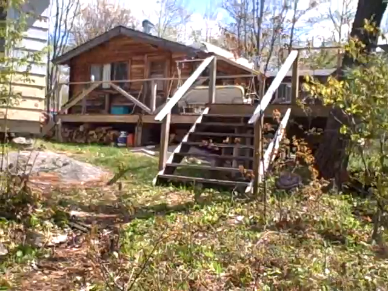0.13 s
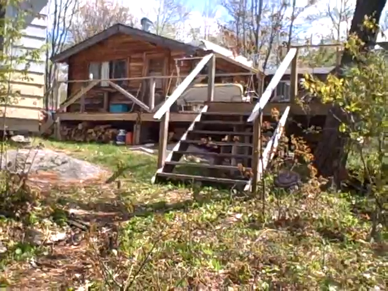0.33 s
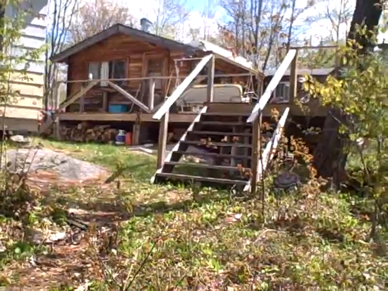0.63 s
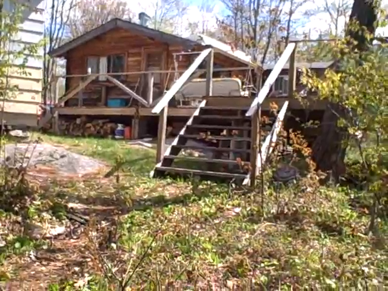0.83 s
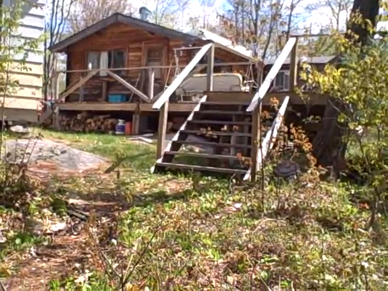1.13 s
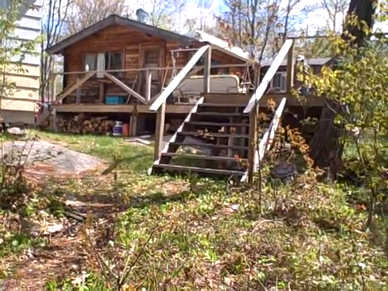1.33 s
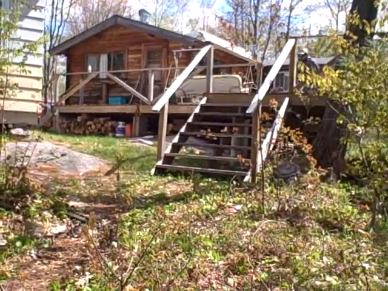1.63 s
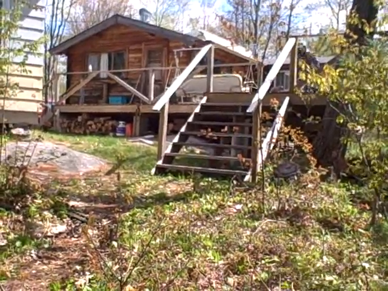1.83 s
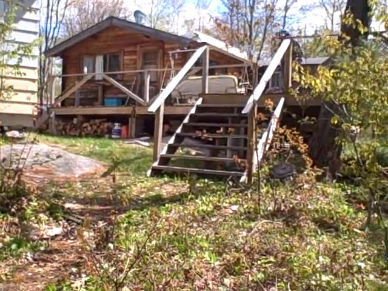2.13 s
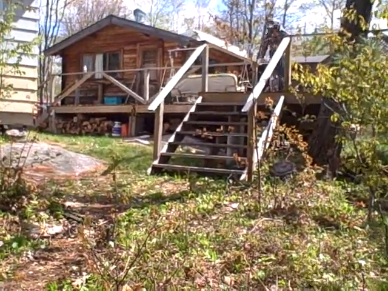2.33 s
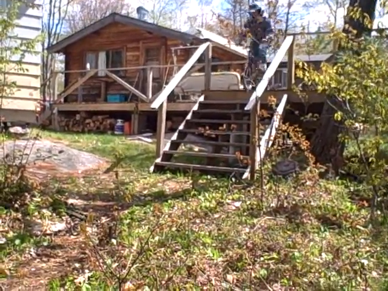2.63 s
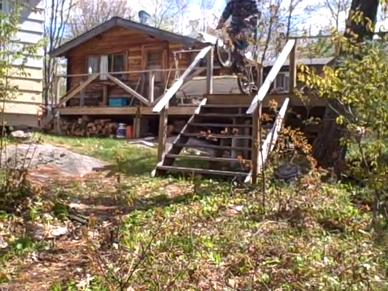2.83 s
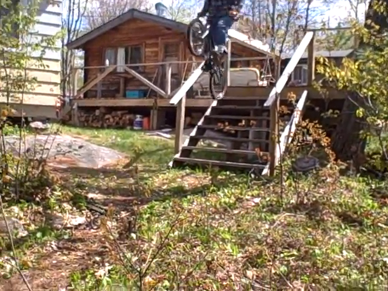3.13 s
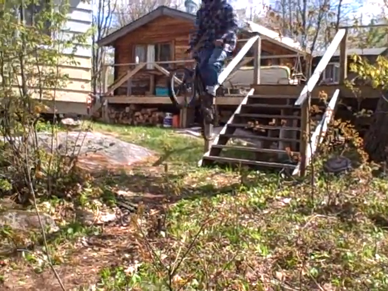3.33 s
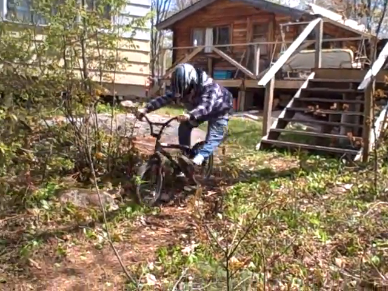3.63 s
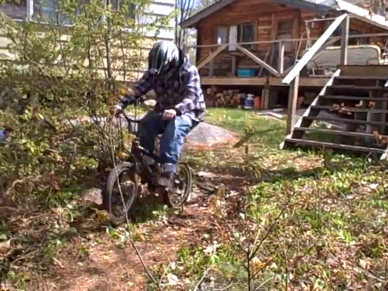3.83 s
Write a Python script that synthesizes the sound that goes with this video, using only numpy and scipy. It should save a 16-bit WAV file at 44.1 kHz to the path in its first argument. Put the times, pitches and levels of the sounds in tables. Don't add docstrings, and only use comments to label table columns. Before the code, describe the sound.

A bicycle approaches in a quiet wooded yard. Until 1.8 s there is soft tree hiss, low wind buffeting the microphone, and faint ticks and metallic jingles. Tyres then drum hollow planks, with knocks near 2.0 s and the strongest at 2.3 s, plus a slap at 2.65 s. Airborne wheels whirr softly from 3.2 s. Two thuds at 3.55 and 3.62 s start loud leaf crunching, sharpest crack at 3.73 s, crackling to the end.

```python
import sys
import numpy as np
from scipy import signal
from scipy.fft import rfft, irfft
from scipy.io import wavfile

SR = 44100
rng = np.random.default_rng(int(sys.argv[2]) if len(sys.argv) > 2 else 0)


def decibels_to_gain(level_db):
    exponent = np.asarray(level_db, float) / 20
    return 10 ** exponent


def persist_wave(psi):
    counts = np.round(np.clip(psi, -1, 1) * 32767).astype(np.int16)
    wavfile.write(sys.argv[1], SR, np.atleast_2d(counts).T)


N = 176400
T = np.arange(N) / SR


def unit_rms(x):
    return x / np.sqrt(np.mean(x ** 2) + 1e-20)


def gain_curve(points):
    return decibels_to_gain(np.interp(T, *np.transpose(points)))


def spectrum_db(points, hz):
    point_hz, point_db = np.transpose(points)
    return np.interp(np.log(hz + 1), np.log(point_hz + 1), point_db)


def colour(x, points):
    magnitude = decibels_to_gain(spectrum_db(points, np.fft.rfftfreq(8192, 1 / SR)))
    cepstrum = irfft(np.log(magnitude))
    cepstrum[1:4096] *= 2
    cepstrum[4097:] = 0
    impulse = irfft(np.exp(rfft(cepstrum)))[:4096]
    return unit_rms(signal.oaconvolve(x, impulse)[:N])


def white():
    return rng.standard_normal(N)


def drift(per_s):
    return unit_rms(signal.lfilter(*signal.butter(2, 2 * per_s / SR), white()))


def decay(start_s, t60_s, rise_s=0.00024):
    t = np.maximum(T - start_s, 0)
    return np.minimum(t / max(rise_s, 1e-4), 1) * decibels_to_gain(-60 * t / t60_s)


def grains(per_s, spread_db):
    hit, sign, size = rng.random((3, N))
    level = decibels_to_gain(-spread_db * np.log(np.maximum(size, .01)))
    return (hit < per_s / SR) * np.sign(sign - .5) * level


def pressure_pulses(rows):
    out = np.zeros(N)
    for start_s, db, hz, cycles in rows:
        u = np.clip((T - start_s) * hz / cycles, 0, 1)
        out += decibels_to_gain(db) * np.sin(np.pi * u ** 0.65) ** 2 * np.sin(2 * np.pi * cycles * u)
    return out


# (frequency [Hz], density [dB per Hz])
AIR_SPECTRUM = [(100, -0.5), (170, -4), (270, -2), (400, -5), (732, -2.5), (2190, -14), (6580, -22.5),
                (11500, -26), (15500, -24.5)]
AIR_DB = -56.5


def air():
    rustle = white() + .5 * grains(330, 3.0)
    swell = decibels_to_gain(AIR_DB + .5 * drift(5.4))
    return swell * colour(rustle, [(30, -33)] + list(AIR_SPECTRUM))


# (time [s], level [dB])
GUSTS = [(.05, -46.5), (.3, -49), (.75, -56), (1.05, -49.5), (1.26, -44), (1.34, -29), (1.43, -42.5),
         (1.6, -45.5), (1.7, -34), (1.85, -41), (2.2, -43), (2.35, -42), (2.5, -41.5), (2.8, -41),
         (2.93, -44.5), (3.15, -45.5), (3.5, -44), (4.0, -39.5)]
# (frequency [Hz], density [dB per Hz])
BUFFET_SPECTRUM = [(12, -4.5), (30, 6.5), (85, -6.5), (180, -15.5), (330, -28.5), (600, -41)]
# (time [s], peak [dB], pitch [Hz], length [cycles])
PUFFS = [(.335, -33, 89, 1.34), (1.283, -34, 70, 1.6), (1.305, -31, 70, 1.44), (1.332, -27, 189, 1.02),
         (1.342, -22.5, 77, 0.71), (1.359, -31.5, 77, 2.8), (1.31, -37, 180, 3), (1.365, -37, 210, 4),
         (1.395, -29, 170, 0.95), (1.642, -32, 60, 1.4), (1.668, -30, 44.8, 1.5),
         (1.6932, -22.5, 234, 1.11), (1.6938, -33, 400, 1.4), (1.706, -30, 55.5, 1.1),
         (1.828, -33, 89, 1.46), (2.53, -33, 55, 1.9), (2.598, -29.5, 55, 0.78), (2.737, -32, 49, 1.1),
         (2.766, -25.5, 71, 0.97), (2.805, -26, 52, 0.96), (3.2, -35.5, 41.6, 2), (3.445, -31, 45, 1.3),
         (3.496, -30, 55.4, 1.7), (3.538, -30.5, 50, 1.1), (3.8, -30.5, 90, 0.97), (3.895, -28.5, 127, 2.7),
         (3.925, -22, 73.3, 1.08)]
LUMPY_DB, LUMPS_PER_S = 2.5, 14
SHARPEN_DB_PER_DB = 0.53


def wind():
    lumps = white() * decibels_to_gain(LUMPY_DB * drift(LUMPS_PER_S))
    lumps = colour(lumps, list(BUFFET_SPECTRUM) + [(1500, -72.0)])
    low = signal.filtfilt(*signal.butter(2, 60, fs=SR), lumps)
    level = gain_curve(GUSTS)
    upper = (lumps - low) * (level / decibels_to_gain(-42.5)) ** SHARPEN_DB_PER_DB
    return level * (low + upper) + pressure_pulses(PUFFS)


# (time [s], peak [dB], pitch [Hz], length [s])
JINGLES = [(0.668, -63, 5700, .03), (.755, -56, 2930, .02), (.758, -57, 5500, .015), (.78, -58, 2910, .02),
           (.772, -61, 6540, .06), (.872, -59, 6500, 0.074), (.875, -58, 2880, 0.028),
           (1.05, -64, 6450, 0.039), (1.1, -69, 6520, 0.024), (1.102, -61, 5800, 0.016),
           (1.205, -67, 6520, .03), (1.39, -65, 5980, .07)]
JINGLE_DB, BLUR_RAD = -8, .8


def jingle():
    out, wander = np.zeros(N), BLUR_RAD * drift(150)
    for start_s, db, hz, length_s in JINGLES:
        swell = np.sin(np.pi * np.clip((T - start_s) / length_s, 0, 1) ** .6)
        out += decibels_to_gain(db) * swell * np.sin(2 * np.pi * hz * T + wander)
    return out * decibels_to_gain(JINGLE_DB)


# (time [s], level [dB], dull edge [Hz], t60 [s])
SLAPS = [
    (1.904, -48.5, 2300, 0.13),
    (2.7, -55, 1100, .2),
    (2.646, -42, 1860, 0.21),
    (2.835, -61.5, 11000, 0.059),
    (2.76, -59.5, 12000, .1),
]
# (time [s], level [dB], centre [Hz], t60 [s])
TICKS = [(.35, -58, 12000, .015), (.635, -58, 11500, .015), (.665, -60, 8500, .02), (.7, -61, 11000, 0.09),
         (.918, -58, 13000, .012), (1.152, -60, 9200, .02), (.993, -59, 11500, .015),
         (1.22, -59, 7000, 0.033), (1.291, -52, 11800, 0.014), (1.303, -59, 9000, .012),
         (1.439, -63, 13500, .015), (1.49, -58, 10000, .04), (1.905, -50, 7440, .02),
         (.385, -50, 1200, .02), (.453, -47, 1400, .025), (2.033, -56.5, 11000, 0.054),
         (2.505, -60, 10000, .02), (3.392, -41, 9000, 0.01), (3.458, -40.5, 7000, 0.01),
         (3.483, -50, 9000, .02), (3.499, -40.5, 7000, .015), (3.5274, -34, 13000, 0.012)]
TICK_WIDTH = 0.72


def clatter():
    out, noise = np.zeros(N), white()
    for start_s, db, edge_hz, t60_s in SLAPS:
        band = signal.butter(1, [500, min(edge_hz, 20000)], "band", fs=SR)
        burst = signal.lfilter([.7, .3], 1, noise * decay(start_s, t60_s, 0.00057))
        out += decibels_to_gain(db + 9) * signal.lfilter(*band, burst)
    for start_s, db, hz, t60_s in TICKS:
        edges_hz = [hz * (1 - TICK_WIDTH / 2), hz * (1 + TICK_WIDTH / 2)]
        band = signal.butter(2, edges_hz, "band", fs=SR)
        out += decibels_to_gain(db + 4.0) * signal.lfilter(*band, noise * decay(start_s, t60_s))
    return out + jingle()


ECHO_DB, ECHO_T60_S = -11, 0.47


def yard_echo(x):
    t = T[:SR // 2]
    tail = grains(2000, 0)[:len(t)] * decibels_to_gain(-60 * t / ECHO_T60_S) * (t > .006)
    return x + decibels_to_gain(ECHO_DB) * signal.oaconvolve(x, tail / np.linalg.norm(tail))[:N]


def ring(modes):
    t = T[:SR // 4]
    out = sum(decibels_to_gain(db - 60 * t / t60_s) * np.sin(2 * np.pi * hz * t) for hz, db, t60_s in modes)
    return out / np.linalg.norm(out)


# (frequency [Hz], level [dB])
PLANK_MODES = [(250, -3), (299, 4), (351, -2), (372, -8), (430, -8), (575, -2.5), (694, 0), (765, -1.5),
               (870, -9.5), (964, -8), (1090, -8), (1230, -17), (1685, 1)]
PLANK_T60_S, PLACE_OCTAVES = .14, .55


def planks(place_hz):
    modes = []
    for hz, db in PLANK_MODES:
        octaves = np.log2(hz / place_hz)
        t60_s = PLANK_T60_S * (300 / hz) ** 0.57
        modes.append((hz, db - 6 * (octaves / PLACE_OCTAVES) ** 2, t60_s))
    return signal.lfilter(*signal.butter(2, 235, "high", fs=SR), ring(modes))


# (time [s], level [dB])
ROLL = [
    (1.65, -80),
    (1.8, -56),
    (2.05, -55),
    (2.2, -54),
    (2.55, -57.5),
    (2.8, -57),
    (3.05, -64.5),
]
# (time [s], level [dB], struck place [Hz], chatter t60 [s])
KNOCKS = [(1.832, -47, 463, 0.084), (1.905, -48.5, 760, 0.25), (1.99, -52, 900, 0.11),
          (1.985, -37.5, 255, 0.11), (2.003, -50, 240, 0.069), (2.017, -42, 249, 0.073),
          (2.035, -44, 240, 0.094), (2.299, -31, 334, 0.062), (2.2982, -35.5, 760, 0.082),
          (2.31, -34, 690, 0.075), (2.321, -35.5, 313, 0.18), (2.343, -33.5, 310, 0.064),
          (2.359, -36, 330, .03), (2.383, -47.5, 780, 0.16), (2.401, -47, 350, 0.26),
          (2.47, -49, 257, 0.17), (2.646, -47.5, 340, 0.15), (2.72, -54, 750, 0.079),
          (2.779, -45, 393, 0.066)]
ROLL_HZ, ROLL_BUMPS_PER_S = 295, 400
STRIKE_GAIN = 8.1


def deck():
    on = (T > ROLL[0][0]) & (T < ROLL[-1][0])
    bumps = grains(ROLL_BUMPS_PER_S, 2.9)
    drumming = unit_rms(signal.oaconvolve(bumps, planks(ROLL_HZ))[:N])
    out = drumming * gain_curve(ROLL) * on
    chatter = white()
    for start_s, db, place_hz, t60_s in KNOCKS:
        strike = STRIKE_GAIN * (np.arange(N) == round(start_s * SR))
        blow = chatter * decay(start_s, t60_s, 0.0014) + strike
        out += decibels_to_gain(db + 4.5) * signal.oaconvolve(blow, planks(place_hz))[:N]
    return out


# (time [s], level [dB])
WHIRR = [
    (3.13, -67),
    (3.2, -57),
    (3.27, -48.5),
    (3.34, -52),
    (3.5, -48),
    (3.6, -59),
    (3.7, -48),
]
# (frequency [Hz], density [dB per Hz])
WHIRR_SPECTRUM = [(1500, -19), (3000, -10.5), (10000, -9), (16000, -3)]


def whirr():
    on = T > WHIRR[0][0]
    hiss = white() + 0.81 * grains(500, 3.5)
    flutter = decibels_to_gain(1.1 * drift(40))
    return on * gain_curve(WHIRR) * flutter * colour(hiss, [(600, -26)] + list(WHIRR_SPECTRUM))


# (time [s], peak [dB], pitch [Hz])
CRACKS = [(3.5559, -30, 4200), (3.5588, -27, 6200), (3.565, -38, 4500), (3.6029, -34, 5700),
          (3.622, -22, 4700), (3.626, -21.5, 4500), (3.6352, -23, 3600), (3.6424, -20, 5400),
          (3.6786, -20, 3400), (3.6872, -21, 7500), (3.6951, -16, 9300), (3.702, -20, 6600),
          (3.709, -22, 9600), (3.7118, -25, 7000), (3.7285, -7, 14500), (3.72865, -13.5, 5500),
          (3.73, -13, 12000), (3.7313, -14, 9500), (3.743, -21, 5500), (3.7576, -27, 6100),
          (3.771, -26, 8000), (3.774, -17, 5200), (3.7859, -20, 6400), (3.7906, -24, 7000),
          (3.8205, -22, 7800), (3.8292, -28, 4500), (3.8343, -27, 5400), (3.8408, -26, 5800),
          (3.8647, -19, 6900), (3.875, -23, 8200), (3.881, -28, 10300), (3.8883, -27, 5600),
          (3.9145, -30, 5000), (3.93, -26.5, 4500), (3.9331, -27, 5700), (3.9768, -24, 8900)]
CRACK_CYCLES = .45


def cracks():
    out = np.zeros(N)
    for (start_s, db, hz), phase in zip(CRACKS, rng.random(len(CRACKS))):
        centre = round(start_s * SR)
        near = slice(centre - 40, centre + 40)
        u = (T[near] - start_s) * hz
        out[near] += decibels_to_gain(db) * np.exp(-(u / CRACK_CYCLES) ** 2) * np.cos(2 * np.pi * (u + phase))
    return out


# (time [s], peak [dB], pitch [Hz], length [cycles])
THUDS = [
    (3.5545, -24.5, 149, 2.3),
    (3.6243, -19.5, 210, 2.64),
]
# (frequency [Hz], density [dB per Hz])
LEAF_SPECTRUM = [(250, 8.5), (450, 7.5), (700, 6.5), (1300, 0.5), (2700, 1), (6500, 3.5), (10500, 0),
                 (15500, 3)]
# (time [s], level [dB], rise [s], t60 [s])
CRUNCHES = [(3.553, -33, 0.0035, 0.15), (3.599, -40, 0.0026, 0.1), (3.621, -27.5, 0.0018, .12),
            (3.636, -28.5, .012, 0.32), (3.672, -32.5, 0.018, 0.35), (3.729, -24, 0.0014, 0.07),
            (3.74, -31.5, 0.018, 0.46), (3.77, -34, 0.0055, 0.18), (3.818, -38.5, .003, 0.45),
            (3.857, -34, 0.009, 0.19), (3.868, -35.5, .006, 0.17), (3.91, -41, 0.0058, 0.81),
            (3.965, -38, 0.02, 0.64)]
# (time [s], level [dB],
# centre [Hz])
SNAPS = [(3.557, -30, 740), (3.6207, -32.5, 680), (3.632, -37, 700), (3.7282, -15.5, 10000),
         (3.7283, -26, 2200), (3.7302, -24, 8000), (3.624, -33, 380), (3.666, -36, 830), (3.58, -41.5, 520),
         (3.874, -33, 3200), (3.887, -35, 704), (3.821, -36, 750), (3.99, -38, 900)]
GRAINS_PER_S, GRAIN_SPREAD_DB, FIZZ, PATCHY_DB = 4500, 2.2, .9, 2.0
SNAP_CYCLES, SNAP_T60_S = 20, .004


def landing():
    power = sum((decibels_to_gain(db) * decay(s, t60_s, rise_s)) ** 2 for s, db, rise_s, t60_s in CRUNCHES)
    litter = FIZZ * white()
    for hz in np.geomspace(900, 13000, 5):
        band = signal.butter(1, [hz / 1.4, hz * 1.4], "band", fs=SR)
        breaks = unit_rms(grains(GRAINS_PER_S / 4, GRAIN_SPREAD_DB))
        litter += signal.lfilter(*band, decibels_to_gain(PATCHY_DB * drift(38)) * breaks)
    out = np.sqrt(power) * colour(litter, [(80, -27)] + list(LEAF_SPECTRUM))
    noise = white()
    for start_s, db, hz in SNAPS:
        band = signal.butter(1, [hz / 2, min(hz * 2, 20000)], "band", fs=SR)
        envelope = decay(start_s, SNAP_CYCLES / hz + SNAP_T60_S, 0.00012)
        out += decibels_to_gain(db) * envelope * unit_rms(signal.lfilter(*band, noise))
    return out + pressure_pulses(THUDS) + cracks()


def scene():
    impacts = clatter() + deck() + landing()
    return (air() + wind() + yard_echo(impacts) + whirr())[None]


def roll_off(x):
    return signal.sosfilt(signal.butter(12, 16990, fs=SR, output="sos"), x)


START_S, FADE_S, EDGE_HZ = 0.034, 0.0091, 15850


def record(dry):
    faded = dry * np.clip((T - START_S) / FADE_S, 0, 1) ** 2
    lowpass = signal.firwin(701, EDGE_HZ, window=("kaiser", 5), fs=SR)
    mix = signal.oaconvolve(faded, lowpass[None], "same")
    return roll_off(mix)


dry = scene()
out = record(dry)
persist_wave(out)
```